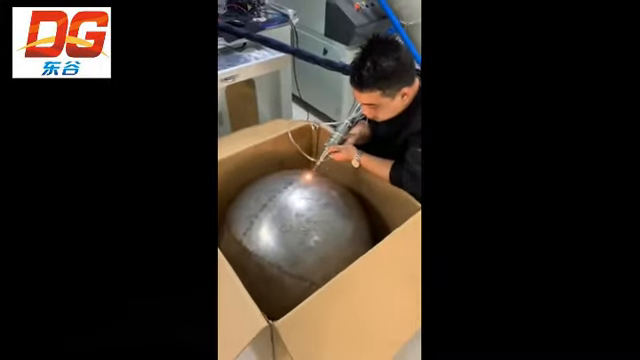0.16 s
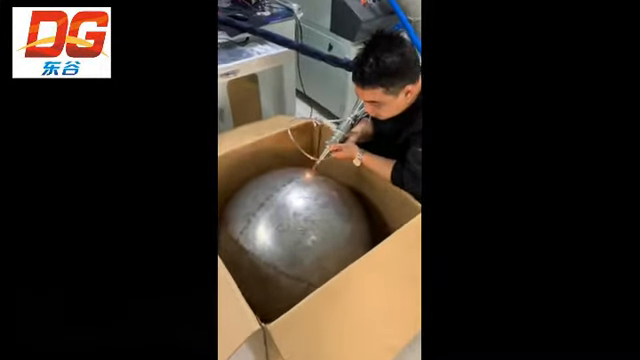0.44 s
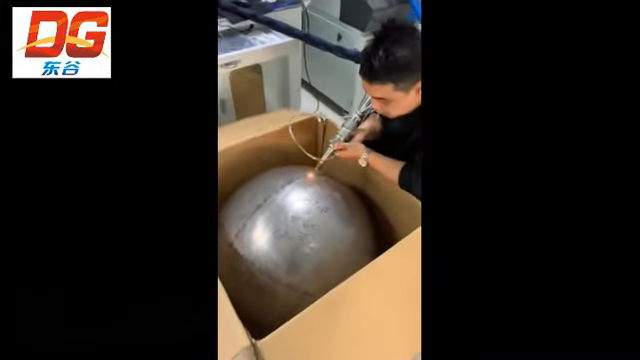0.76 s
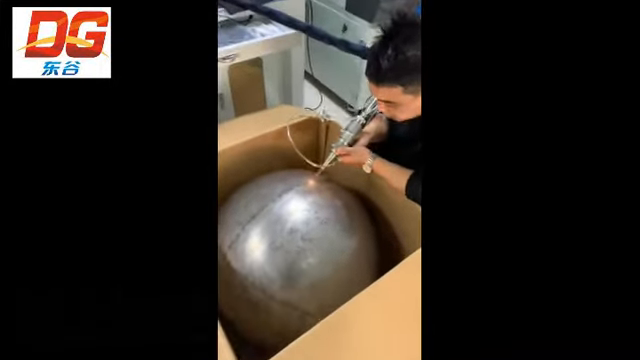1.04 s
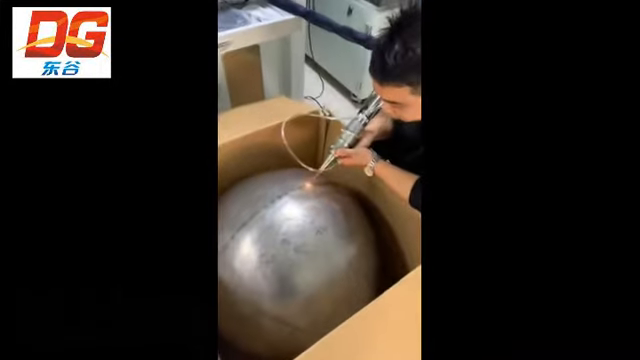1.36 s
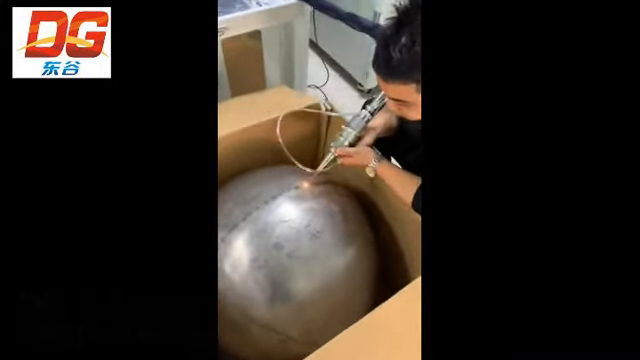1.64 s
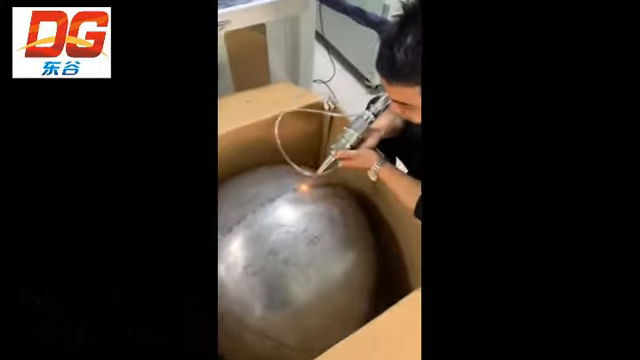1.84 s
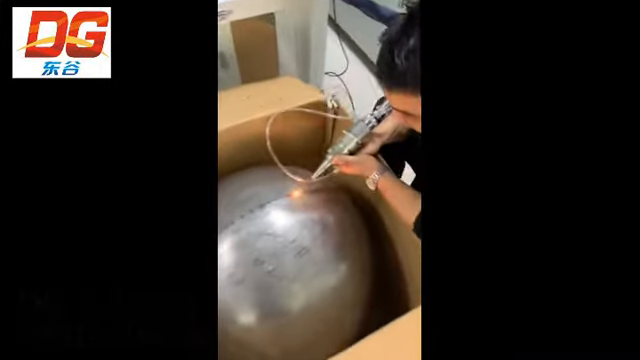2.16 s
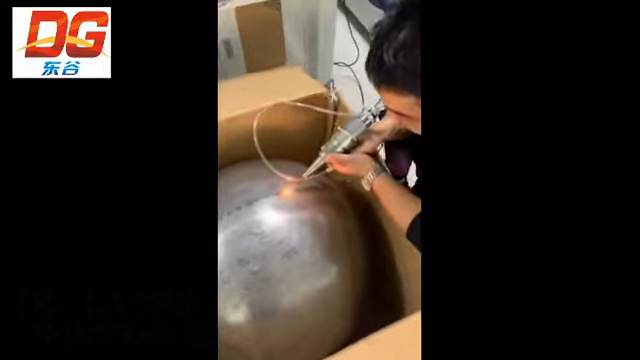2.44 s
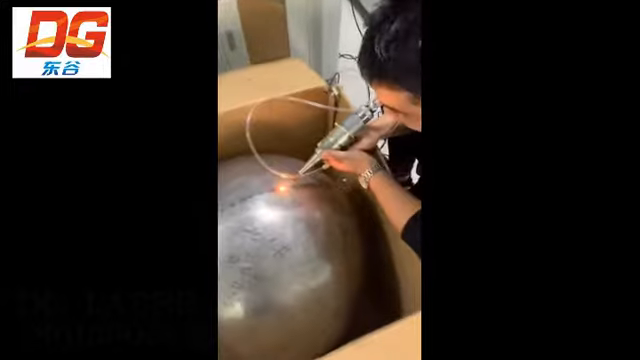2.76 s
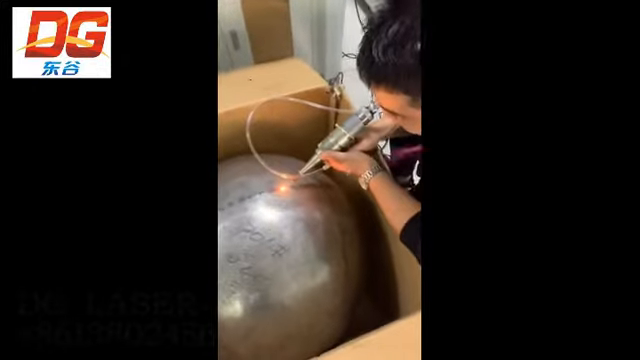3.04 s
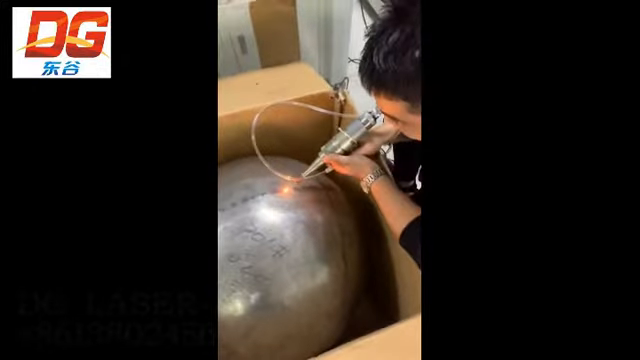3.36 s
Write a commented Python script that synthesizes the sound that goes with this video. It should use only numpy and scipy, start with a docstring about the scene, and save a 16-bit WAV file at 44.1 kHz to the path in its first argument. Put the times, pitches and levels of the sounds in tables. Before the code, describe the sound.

A hand-held welding gun hisses steadily with faint spatter over rumbling machine fans.

```python
"""First comes a steady hiss over a low rumble: a hand-held welding gun runs over a steel ball in a workshop.
Shielding gas hisses from the nozzle with a faint spatter, the machine's fans rumble and hum, and its
electronics whine. Scuffs and a few small metal clacks pass. Partway through, a bright rush darkens as it
dies away in the hall; later comes a soft bump. A phone listens through two close microphone ports."""
import sys
import numpy as np
from scipy.fft import rfft, irfft, next_fast_len
from scipy.io import wavfile

SR = 44100
rng = np.random.default_rng(int(sys.argv[2]) if len(sys.argv) > 2 else 0)


def unload_audio(sound):
    """Save the sound as a 16-bit wav file, at the path given as the first command line argument."""
    columns = np.transpose(np.atleast_2d(sound))
    # keep every value between -1 and 1, then stretch to whole-number steps
    steps = np.round(np.clip(columns, -1, 1) * 32767)
    wavfile.write(sys.argv[1], SR, steps.astype(np.int16))


N = 154791
SIZE = next_fast_len(N + 4096, real=True)  # padded length for filtering
T, F = np.arange(N) / SR, np.fft.rfftfreq(SIZE, 1 / SR) + 1e-3  # times in seconds, frequencies in Hz

# Fan and pump tones. Each row: pitch in Hz, base level in dB, unsteadiness from 0 to 1.
MACHINE_TONES = [(48.54, -47, .2), (70.3, -46, 0.16), (99.1, -52, 0.7), (125.4, -53.5, 0.05),
                 (150.1, -52.5, .6), (399.7, -60.5, 0.2), (426, -58.5, 1), (485, -61.5, 0.5),
                 (500, -65, 0.4), (834, -61.5, 0.3), (853, -65.5, 0.6)]
# Air moved by the fans. Each row: frequency in Hz, relative level in dB.
AIR_COLOUR = [(6, -48), (20, -21), (30, -10), (39, 7.5), (75, -2.5), (115, -3.5), (180, -4.5), (250, -3.5),
              (330, -6.5), (450, -10.5), (600, -11), (900, -12.5), (1400, -16.5), (2500, -29.5),
              (7000, -55.5)]
# Swells of the deep rumble. Each row: time in seconds, boost or cut in dB.
RUMBLE_SWELL = [(0, -0.5), (.25, -4.5), (.75, 3), (1.25, 4.5), (1.52, 1), (1.95, 0.5), (2.25, -4.5),
                (2.5, 3), (2.85, 3.5), (3.02, -8), (3.15, 5), (3.3, -4), (3.46, 10)]
# The two main hums, one table each. Each row: time in seconds, level in dB.
LOW_HUM_SWELL = [(0, -49.5), (0.551, -50.5), (1.25, -45.5), (1.45, -60.5), (1.65, -66), (1.78, -46.5),
                 (2.4, -51.5), (2.652, -58), (3.1, -52), (3.5, -47.5)]
HIGH_HUM_SWELL = [(0, -48), (.5, -51), (.85, -60), (1.25, -57), (1.8, -49), (2.05, -50), (2.35, -50),
                  (3.5, -50)]
# Scuffs. Each row: peak time, rise and fall in seconds, level in dB, brightness in dB per octave.
SCUFF_EVENTS = [(0.257, .026, 0.014, -37, 2), (0.329, 0.01, 0.021, -41.5, -13),
                (.385, 0.008, 0.007, -43, -4), (.55, 0.025, 0.064, -43, -6),
                (1.396, 0.0088, 0.0073, -33, 7), (1.417, 0.011, 0.013, -41.5, 2),
                (1.49, .016, 0.022, -38.5, -2), (1.522, .01, 0.031, -37, 0),
                (1.549, 0.035, 0.02, -39.5, -9), (1.619, .012, 0.011, -39.5, 0.5),
                (1.686, .014, .07, -37.5, 7), (1.705, 0.027, 0.094, -39.5, -5),
                (2.09, 0.087, 0.24, -43, -4.5), (2.875, 0.021, 0.11, -50.5, 1),
                (3.275, 0.019, 0.046, -43, 1.5)]
# The tone colour of a scuff. Each row: frequency in Hz, relative level in dB.
SCUFF_COLOUR = [(60, -40.5), (200, -23), (500, -3), (900, 5), (1800, -2), (2600, -4.5), (3800, -6.5),
                (4600, -4.5), (7500, -21)]
# Clacks. Each row: start in seconds, ring level in dB, brightness in dB per octave, tail level in dB.
CLACK_EVENTS = [(.3574, -30, 9, -47), (.3606, -25.5, 0, -40), (.3763, -37, 7, -47), (.3837, -40, 12, -49),
                (2.3137, -32, 0, -34)]
# Notes of the struck metal. Each row: pitch in Hz, relative level in dB, seconds to fade by 60 dB.
METAL_NOTES = [(1840, -13, .008), (2430, -3, .007), (3080, -4, .011), (3380, -11, .085), (3780, -3, .018),
               (5900, -18, .008)]
# The noisy tail of a clack. Each row: frequency in Hz, relative level in dB.
TAIL_COLOUR = [(400, -9), (1200, -12.5), (2000, -1), (3700, -4.5), (4500, -2), (6200, -3), (7500, -15.5)]
# Bands of the rush. Each row: centre in Hz, delay and rise in seconds, peak in dB, fade in dB per second.
RUSH_BANDS = [(355, 0.025, 0.1, -42.5, 15.6), (637, 0.029, 0.041, -46.5, 13.5),
              (1000, 0.036, 0.13, -43.5, 31), (1570, 0.0019, 0.0055, -47, 13),
              (2870, 0.00019, 0.014, -40.5, 40), (3840, 0, 0.015, -45, 83), (4700, 0, 0.037, -40, 62),
              (6500, 0, 0.014, -55, 100)]
# Brief whistles of the jet. Each row: peak time in seconds, half-length in seconds, level in dB.
WHISTLE_EVENTS = [(.80, .025, -49), (2.87, .02, -51)]
# The gas jet's tone colour. Each row: frequency in Hz, relative level in dB.
GAS_COLOUR = [(500, -4.5), (1200, -4.5), (1800, 1.5), (2200, 4), (3000, 3), (4000, 2), (4350, -5),
              (5300, -2.5), (6000, -.5), (6500, -1.5), (7200, 4), (7700, -3)]
# Resonances, narrow bands where the hiss rings. Each row: centre in Hz, width in Hz, base level in dB.
GAS_RESONANCES = [(850, 76, -62.5), (995, 41, -63), (1790, 350, -58.5), (2420, 290, -59), (2590, 58, -57.5),
                  (3230, 390, -60), (3570, 110, -63), (3840, 200, -57.5), (4190, 220, -63.5),
                  (4590, 270, -63), (5725, 380, -57), (7484, 130, -58.5)]
# The slow swell of the hiss. Each row: time in seconds, boost or cut in dB.
HISS_SWELL = [(0, -1.5), (.6, -1), (1.3, -0.5), (1.9, 0), (2.5, 1.2), (2.9, 1), (3.5, -0.5)]
# How alike the two ports sound. Each row: frequency in Hz, likeness from 0 to 1.
PORT_LIKENESS = [(300, 0.99), (400, 0.3), (600, 0.32), (1100, 0.48), (1550, 0.78), (2000, 0.58),
                 (2800, 0.68), (3800, 0.24), (4600, .6), (5000, 0.59), (5500, 0.58), (6200, 1),
                 (6700, 0.95), (7300, 0.51)]
# How far the wave at the left port is ahead. Each row: frequency in Hz, lead in radians.
LEFT_LEAD = [(250, 0), (520, -.4), (780, -.1), (1100, -.3), (1800, .1), (2600, 1), (3000, 1.8), (3600, 1.5),
             (4700, 3.1), (5200, 3.3), (6200, 5.6), (6700, 6.2), (7300, 6.35), (7700, 6.8)]


def undb(db):
    """Turn decibels into a gain, the number to multiply a sound by."""
    return 10 ** (np.asarray(db) / 20)


def unit(x):
    """Scale a signal so its average strength (rms) is 1."""
    return x / np.sqrt(np.mean(x ** 2))


def curve(x, points):
    """Join a table's points with straight lines and read them at x."""
    return np.interp(x, *np.array(points).T)


def filtered(x, gain):
    """Turn each frequency of a sound up or down by its gain."""
    return irfft(rfft(x, SIZE) * gain, SIZE)[:, :N]


def colour(points):
    """Gain at every frequency, from rows of Hz and dB."""
    hz, db = np.array(points).T
    return undb(np.interp(np.log(F), np.log(hz), db))


def resonance(hz, width):
    """Gain that lets through one steep-sided band around hz."""
    return 1 / (1 + ((F * F - hz * hz) / (F * width * 1.5)) ** 2)


def wander(rate_hz):
    """Smooth random motion of typical size 1; a higher rate moves faster."""
    f = np.fft.rfftfreq(4096, 1 / 1000)
    slow = irfft(rfft(rng.standard_normal(4096)) * np.exp(-(f / rate_hz) ** 2) * (f > 0))
    return unit(np.interp(T, np.arange(4096) / 1000, slow))


def ports(gain, drive=None):
    """Filtered noise (or drive) at both ports, strength 1: part shared, part separate noise."""
    apart = 1 / (1 + (392 / F) ** 10)  # bass below about 392 Hz is alike in both
    alike = 1 - apart * (1 - np.clip(curve(F, PORT_LIKENESS), 0, 1))
    lead = np.exp(.5j * apart * curve(F, LEFT_LEAD))
    noise = rng.standard_normal((3, 2 * len(F))).view(complex) * np.sqrt(SIZE / 2)
    source = noise[0] if drive is None else rfft(unit(drive), SIZE)
    direct = source * np.array([lead, lead.conj()])
    mix = np.sqrt(alike) * direct + np.sqrt(1 - alike) * noise[1:]
    return unit(irfft(gain * mix, SIZE)[:, :N])


def close_echoes(x, level_db=-10, fade_s=.008):
    """Quick echoes off the ball and the box around the nozzle colour a sound."""
    echoes = rng.standard_normal(N) * np.exp(-T / fade_s)
    response = 1 + undb(level_db) * rfft(echoes / np.sqrt(np.sum(echoes ** 2)), SIZE)
    return filtered(x, response) / np.sqrt(1 + undb(level_db) ** 2)


def fan_tone(hz, unsteady, pitch_drift=.00407):
    """A turning shaft or blade hums, wavering in pitch and loudness."""
    cycles = np.cumsum(hz * (1 + pitch_drift * wander(2.2))) / SR + rng.random()
    wobble = 1 + unsteady * (wander(9.5) + 1j * wander(4.8))
    return unit(np.real(np.exp(2j * np.pi * cycles) * wobble))


def fans(air_db=-41.5, low_hum_hz=209, high_hum_hz=292.3, rumble_top_hz=60.4):
    """Fans hum over moving air; the deep rumble and the two main hums swell separately."""
    out = undb(air_db) * ports(colour(AIR_COLOUR))
    for hz, db, unsteady in MACHINE_TONES:
        out += undb(db) * fan_tone(hz, unsteady)
    for hz, swell in (low_hum_hz, LOW_HUM_SWELL), (high_hum_hz, HIGH_HUM_SWELL):
        out += undb(curve(T, swell)) * fan_tone(hz, unsteady=.38)
    rumble = filtered(out, 1 / (1 + (F / rumble_top_hz) ** 10))
    return out + rumble * (undb(curve(T, RUMBLE_SWELL)) - 1)


def whine(hz=4900, level_db=-58):
    """The electronics make a thin tone; its wave pushes at one port as it pulls at the other."""
    tone = np.sin(2 * np.pi * hz * T + .5 * wander(6))
    return undb(level_db) * unit(tone * undb(3 * wander(5))) * np.array([[1], [-1]])


def bump(peak_s=2.7, half_length_s=.05, level_db=-42.5):
    """A short swell of low noise makes a soft, hollow bump."""
    swell = np.exp(-((T - peak_s) / half_length_s) ** 2)
    return undb(level_db) * swell * ports(resonance(hz=230, width=65))


def scuffs(grain_db=1):
    """Short, grainy rubs swell and die away."""
    out = 0
    octaves = np.log2(np.maximum(F, 200) / 1000)
    for at, rise, fall, db, brightness in SCUFF_EVENTS:
        swell = np.exp(-np.maximum((at - T) / rise, (T - at) / fall))
        out += undb(db) * swell * ports(colour(SCUFF_COLOUR) * undb(brightness * octaves))
    return out * undb(grain_db * wander(110))


def clacks(rise_s=.0003, tail_s=.0097, right_lag_s=.00009):
    """Small hard hits and bounces: the metal rings briefly and the room adds a noisy tail."""
    out = 0
    for at, db, brightness, tail_db in CLACK_EVENTS:
        age = np.clip(T - at - np.array([[0], [right_lag_s]]), 0, .5)
        ring = 0
        for hz, note_db, fade_s in METAL_NOTES:
            gain = undb(note_db + brightness * np.log2(hz / 3000))
            ring += gain * np.exp(-np.log(1000) * age / fade_s) * np.sin(2 * np.pi * hz * age)
        tail = np.exp(-age / tail_s) * ports(colour(TAIL_COLOUR))
        out += np.minimum(age / rise_s, 1) * (undb(db) * ring + undb(tail_db) * tail)
    return out


def rush(start_s=1.375, ring_amount=.31, grain_db=1.8):
    """A rough burst of noise: the highs come first and die fast, the lows linger in the hall."""
    out = 0
    # It shares all but the highest of the hiss's resonances.
    rings = 1 + ring_amount * sum(resonance(hz, width) for hz, width, _ in GAS_RESONANCES[:-1])
    for hz, delay, rise, db, fade in RUSH_BANDS:
        age = T - start_s - delay
        swell = np.clip(age / rise, 0, 1) * undb(db - fade * np.maximum(age - rise, 0))
        flutter = undb(.48 * wander(35))
        out += swell * flutter * ports(rings * resonance(hz, width=.29 * hz))
    return out * undb(grain_db * wander(88))


def whistles():
    """The gas jet sharpens for a moment into a faint whistle."""
    swell = sum(undb(db) * np.exp(-((T - at) / half) ** 2) for at, half, db in WHISTLE_EVENTS)
    return swell * ports(resonance(hz=2620, width=46))


def spatter(per_second=95, spread_db=14.5, base_db=-57):
    """The melted metal spits tiny clicks at random, a few much louder than the rest."""
    spits = rng.random(N) < per_second / SR
    sizes = undb(spread_db * np.minimum(rng.exponential(size=N), 3))
    return undb(base_db) * ports(colour(GAS_COLOUR), spits * sizes)


def gas_jet(base_db=-48.5, flutter_db=2.5, sputter_db=1.2, sputter_above_hz=5300):
    """Gas hisses from the nozzle along with the spatter; its resonances flutter and its highs sputter."""
    out = undb(base_db + .5 * wander(29)) * ports(colour(GAS_COLOUR))
    for hz, width, db in GAS_RESONANCES:
        flutter = undb(flutter_db * wander(19))
        out += undb(db) * unit(flutter * ports(resonance(hz, width)))
    out += spatter()
    highs = filtered(out, 1 / (1 + (sputter_above_hz / np.maximum(F, 1)) ** 20))
    out += highs * (undb(sputter_db * wander(28)) - 1)
    return out * undb(curve(T, HISS_SWELL))


def scene():
    """Add up every sound that reaches the phone."""
    welder = fans() + close_echoes(gas_jet()) + whistles() + whine()
    return welder + close_echoes(rush() + scuffs()) + clacks() + bump()


def record(dry, top_hz=7590):
    """The phone steeply cuts off the highest sounds."""
    return filtered(dry, 1 / np.sqrt(1 + np.minimum(F / top_hz, 2) ** 400))


dry = scene()
out = record(dry)
unload_audio(out)
```